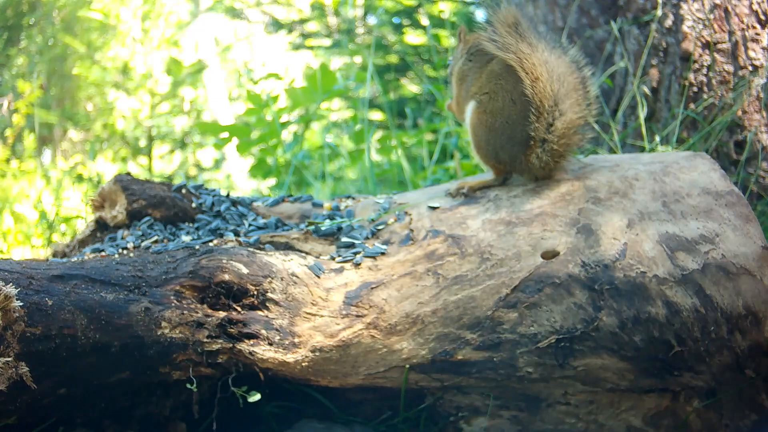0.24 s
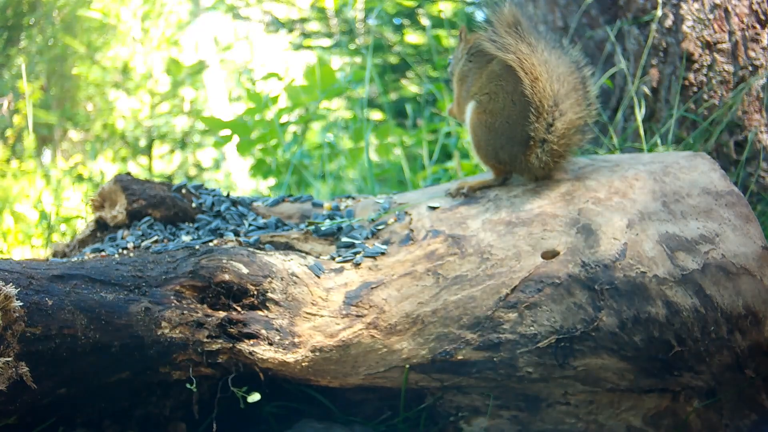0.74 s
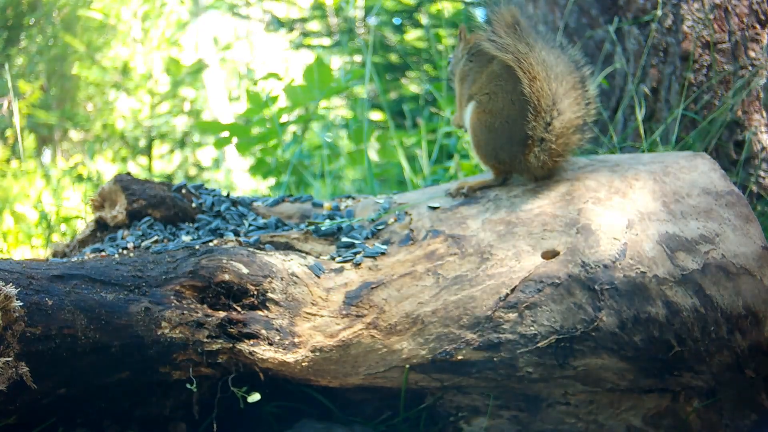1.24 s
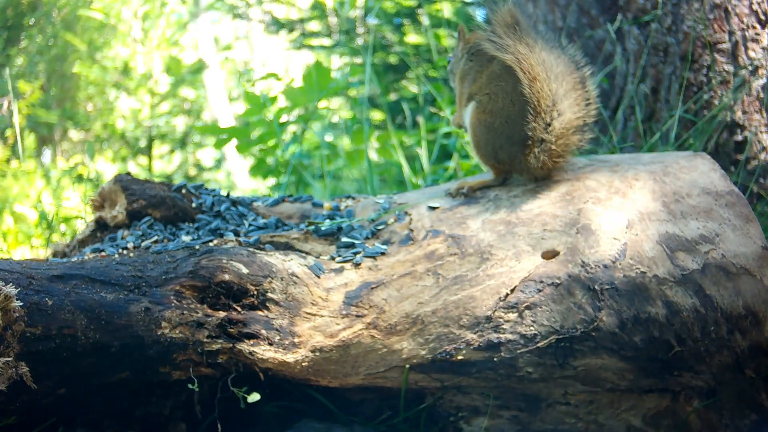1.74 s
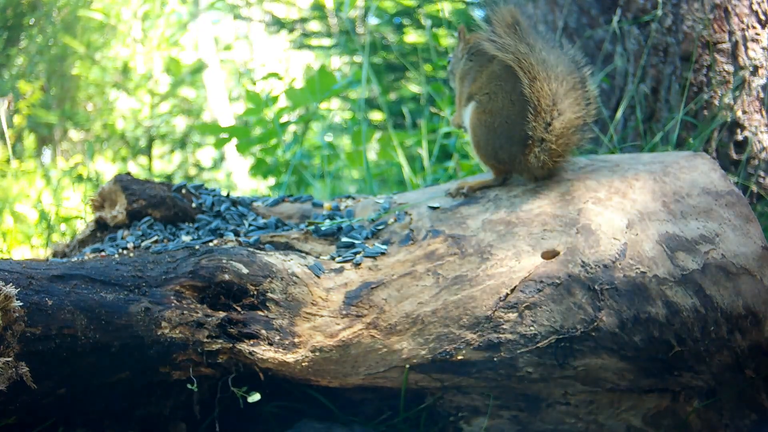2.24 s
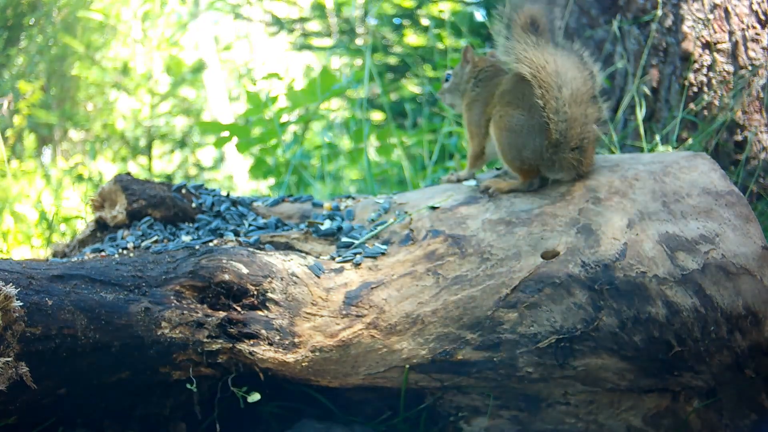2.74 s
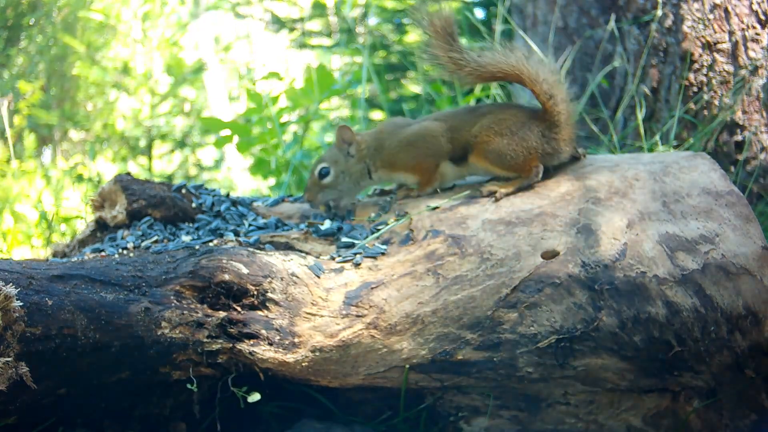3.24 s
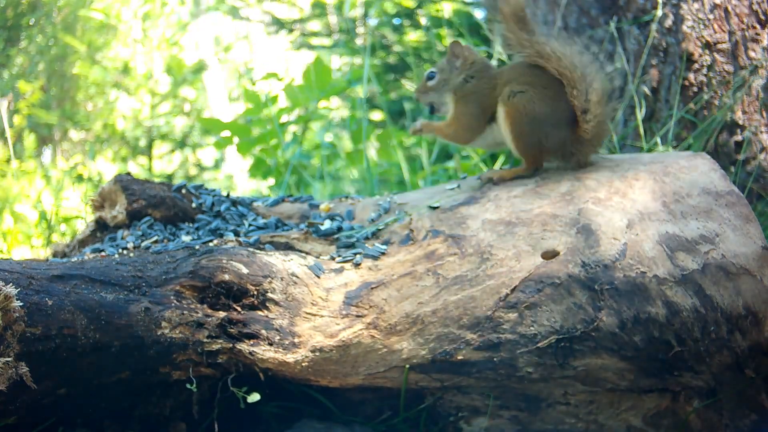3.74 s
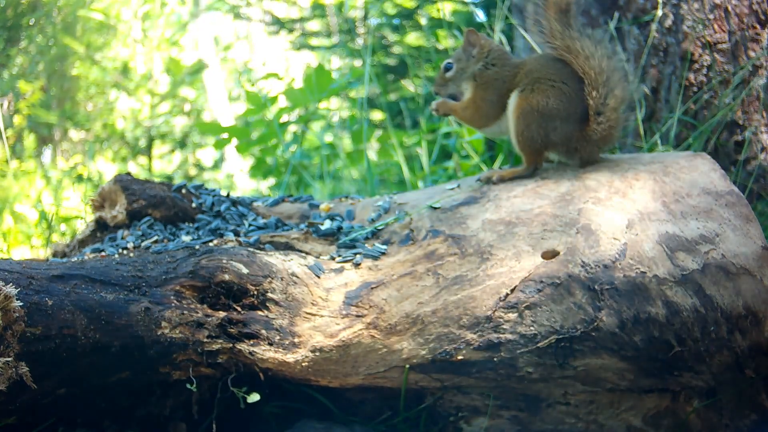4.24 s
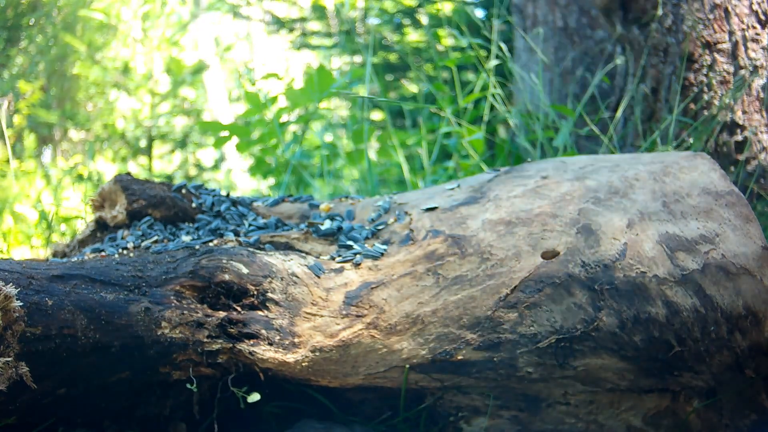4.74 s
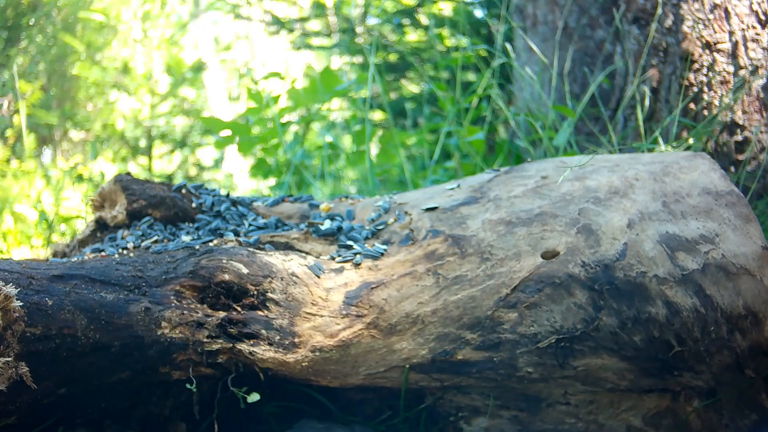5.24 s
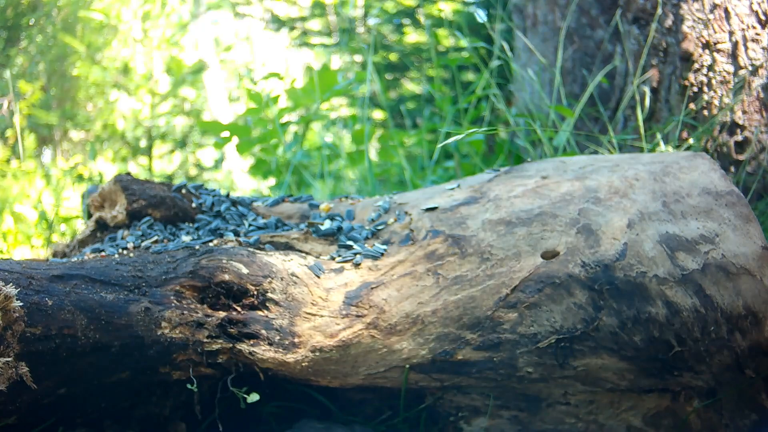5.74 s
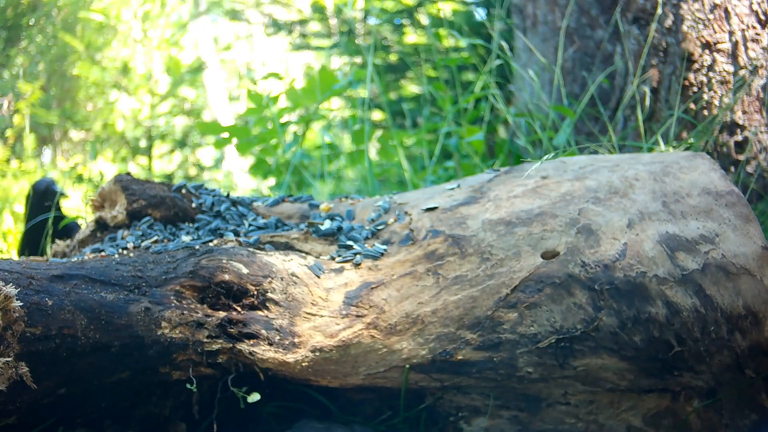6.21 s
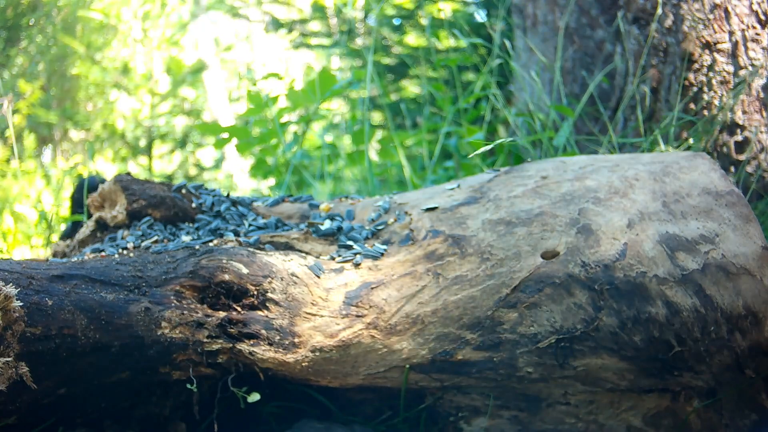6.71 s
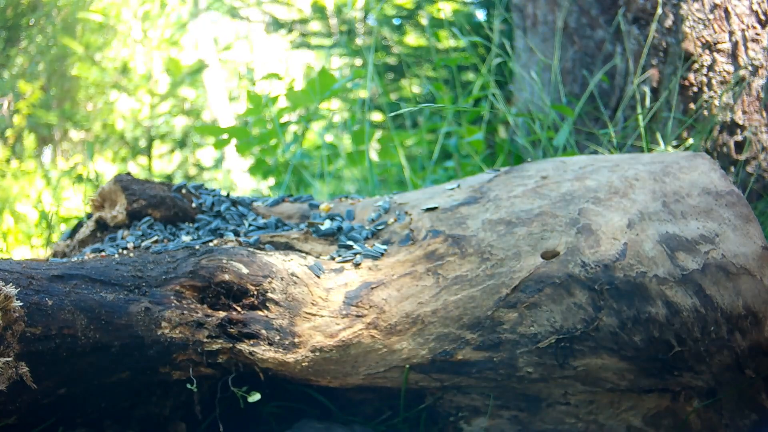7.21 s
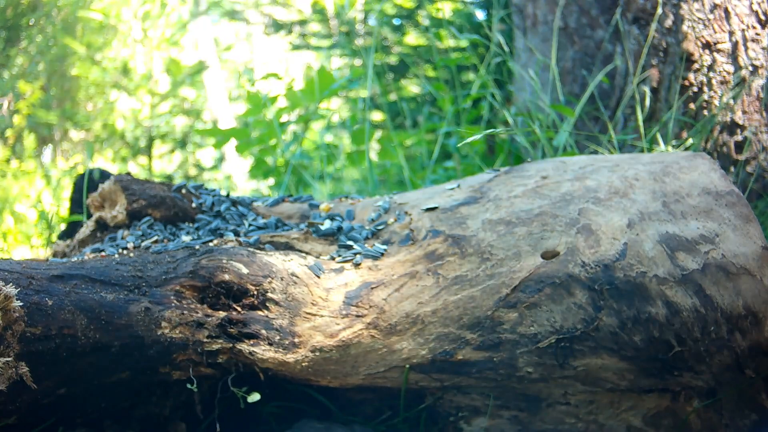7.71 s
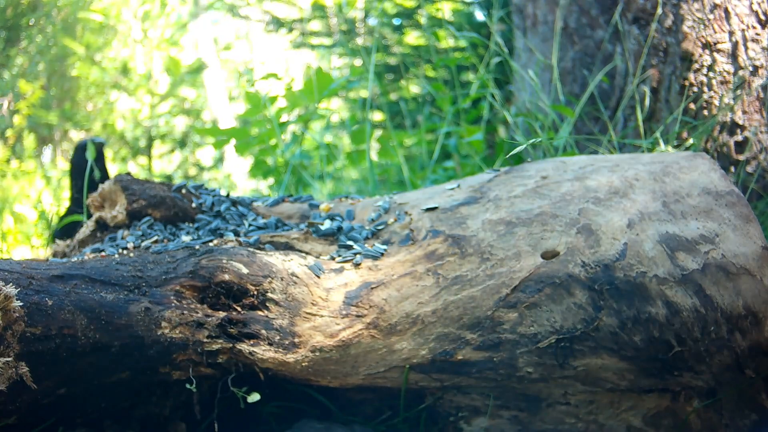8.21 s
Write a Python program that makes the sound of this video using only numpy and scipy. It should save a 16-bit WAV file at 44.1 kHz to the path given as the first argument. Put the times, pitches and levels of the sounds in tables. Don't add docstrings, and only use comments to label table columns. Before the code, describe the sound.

Outdoors among trees, with steady soft leaf rustle and far traffic. A young crow begs in the distance while a small bird lisps thin, high whistles. One begging cry comes close by, followed by two short whines, then an adult crow gives six hoarse, loud caws in quick succession. Sharp chips and tiny twig ticks fall among them. The near calls are mostly dry with a dull tree echo, and their peaks overload the microphone.

```python
import sys
import numpy as np
from scipy import signal
from scipy.fft import rfft, irfft
from scipy.io import wavfile
from scipy.ndimage import uniform_filter1d

SR = 44100
rng = np.random.default_rng(int(sys.argv[2]) if len(sys.argv) > 2 else 0)


def nominal_scale(level):
    x = np.asarray(level, float) / 20
    return 10 ** x


def to_wav(s):
    ch = np.atleast_2d(s).T
    pcm = np.round(np.clip(ch, -1, 1) * 32767)
    wavfile.write(sys.argv[1], SR, pcm.astype(np.int16))


N = 373086


def rms_one(x):
    return x / np.sqrt(np.mean(x ** 2) + 1e-20)


def in_time(rows, t):
    s, *columns = np.transpose(rows)
    return [np.interp(t, s, column) for column in columns]


def span(rows):
    first, last = round(rows[0][0] * SR), min(round(rows[-1][0] * SR), N)
    return slice(first, last), np.arange(first, last) / SR


def drift(hz, size):
    r = np.exp(-2 * np.pi * hz / SR)
    settle = 4000
    wander = signal.lfilter([1], [1, -2 * r, r * r], rng.standard_normal(size + settle))
    return rms_one(wander[settle:])


def filtered(x, order, hz, kind):
    return signal.sosfilt(signal.butter(order, hz, kind, fs=SR, output="sos"), x)


def poles(hz, width):
    r = np.exp(-np.pi * width / SR)
    return [(1 - r * r) / 2, 0, (r * r - 1) / 2], [1, -2 * r * np.cos(2 * np.pi * hz / SR), r * r]


def ring_twice(x, hz, width):
    once = signal.lfilter(*poles(hz, width), x)
    return signal.lfilter(*poles(hz, width), once)


def moving(x, hz, width):
    out, state = np.zeros(len(x)), np.zeros(2)
    for i in range(0, len(x), 128):
        out[i:i + 128], state = signal.lfilter(*poles(hz[i], width), x[i:i + 128], zi=state)
    return out


def air():
    # pitch_hz, level_db (per Hz)
    colour = [(15, -55.5), (25, -33), (41, -7.5), (97, -4), (153, -4.5), (190, -22.5), (427, -10.5),
              (475, -10.5), (1190, -1.5), (1360, -0.5), (2680, -6), (3330, -11), (6720, -27), (8800, -34.5),
              (16000, -68.5)]
    # time_s, level_db
    strength = [(0, -58.5), (2.4, -59), (7, -60), (8.46, -61)]
    hz, db = np.transpose(colour)
    grid = np.maximum(np.fft.rfftfreq(N, 1 / SR), 1)
    gain = nominal_scale(np.interp(np.log(grid), np.log(hz), db))
    noise = irfft(rfft(rng.standard_normal(N)) * gain, N)
    level_db = in_time(strength, np.arange(N) / SR)[0]
    gust_db = 0.5 * drift(1.0, N)
    return rms_one(noise) * nominal_scale(level_db + gust_db)


def lisps():
    # start_s, length_s, pitch_hz, level_db
    notes_sung = [(0.082, .12, 7800, -73), (.23, .07, 8120, -74), (.33, 0.13, 7850, -70),
                  (0.423, 0.1, 7700, -73), (.765, 0.15, 8150, -77), (.975, .15, 8110, -73),
                  (1.153, .1, 8110, -72), (1.275, .14, 8000, -74), (1.59, .07, 7780, -81)]
    scoop_hz, scoop_s, attack_s = 450, 0.03, 0.025
    out = np.zeros(N)
    for s, length, hz, db in notes_sung:
        at, t = span([(s,), (s + length,)])
        scoop = scoop_hz * np.clip(1 - (t - s) / scoop_s, 0, 1)
        pitch = hz - scoop + 90 * drift(120, len(t))
        shape_db = np.interp(t - s, [0, attack_s, length * 0.6, length], [-2, 0, -2.5, -14])
        husk = 1 + 0.5 * drift(90, len(t))
        whistle = np.sin(2 * np.pi * np.cumsum(pitch) / SR)
        out[at] += nominal_scale(db + shape_db) * np.hanning(len(t)) ** 0.17 * husk * whistle
    return out


def chips():
    # start_s, start_hz, end_hz, length_s, level_db
    stray = [
        (1.7, 6900, 6900, 0.069, -75),
        (1.71, 5300, 5160, 0.037, -78),
    ]
    # delay_s, start_hz, end_hz, length_s, level_db
    phrase = [
        (0, 5020, 4080, 0.025, 4),
        (0.01, 3060, 3730, .025, 7),
        (.03, 2560, 2830, .03, 9),
    ]
    # start_s, level_db
    phrase_starts = [(4.575, -69), (4.711, -59), (4.765, -60), (5.257, -62), (5.4, -64.5), (5.967, -61),
                     (6.124, -61)]
    glides = list(stray)
    for s, db in phrase_starts:
        for delay, from_hz, to_hz, length, note_db in phrase:
            glides.append((s + delay, from_hz, to_hz, length, db + note_db))
    out = np.zeros(N)
    for s, from_hz, to_hz, length, db in glides:
        hz = np.linspace(from_hz, to_hz, round(length * SR))
        unsteady_hz = hz + 70 * drift(200, len(hz))
        whistle = np.sin(2 * np.pi * np.cumsum(unsteady_hz) / SR)
        out[round(s * SR):][:len(hz)] += nominal_scale(db + 1.5) * np.hanning(len(hz)) * whistle
    return out


def knocks(events, hz, width):
    clicks = np.full(N, 1e-18)
    for s, db in events:
        clicks[round(s * SR)] = nominal_scale(db) * 6.8 * SR / (np.pi * width)
    return ring_twice(clicks, hz, width)


def twigs():
    # start_s, peak level_db
    snaps = [
        (4.7257, -47),
        (4.769, -44.5),
        (8.3135, -59),
    ]
    return nominal_scale(-4.5) * knocks(snaps, 3800, 3500)


def throat(x, modes, beak_hz, bright_db, restless_db=1.5):
    rung = []
    for k, (hz, width, db) in enumerate(modes):
        sign = (-1) ** k
        rung.append(sign * nominal_scale(db) * ring_twice(x, hz, width))
    width, db = modes[2][1:]
    rung[2] = nominal_scale(db) * moving(moving(x, beak_hz, width), beak_hz, width)
    voice = filtered(sum(rung[:4]), 6, 2040, "low")
    for mode in rung[4:]:
        voice = voice + mode * nominal_scale(bright_db + restless_db * drift(13, len(x)))
    return voice


def crow(calls, modes, jitter, throb, breath, smear, top_hz, low_hz=330):
    out = np.zeros(N)
    for rows in calls:
        at, t = span(rows)
        size = len(t)
        pitch, level_db, half_db, flutter, beak_hz, bright_db = in_time(rows, t)
        rate = 61 * (pitch / 520) ** 0.3
        beat = 2 * np.pi * np.cumsum(rate * (1 + 0.18 * drift(30.2, size))) / SR
        shake = np.sin(beat) + 0.5 * np.sin(2 * beat + 1.02)
        unsteady = 1 + 4 * np.exp(-(t - t[0]) / 0.028) + np.exp((t - t[-1]) / 0.015)
        wobble = flutter * shake + jitter * unsteady * drift(150, size)
        turn = np.pi * np.cumsum(pitch * (1 + wobble)) / SR
        order = np.arange(1, int(2 * top_hz / pitch.min()))[:, None]
        lines = np.cos(order * turn + smear * order ** 2) * (order * pitch < 2 * top_hz)
        lines[0] *= 0.08
        pulses = lines[1::2].sum(axis=0) + nominal_scale(half_db) * lines[::2].sum(axis=0)
        puff = 1 + 0.5 * np.cos(2 * turn)
        hiss = breath * unsteady * puff * signal.lfilter([6.3, -4.5], [1], rng.standard_normal(size))
        source = (pulses + hiss) * (1 + throb * flutter * np.cos(beat + 1.1))
        voice = throat(source, modes, beak_hz, bright_db)
        voice = filtered(voice, 4, [low_hz, top_hz], "band")
        evened = voice / np.sqrt(uniform_filter1d(voice ** 2, size=900) + 1e-12)
        from_edge = np.minimum(t - t[0], t[-1] - t)
        out[at] += evened * nominal_scale(level_db) * np.clip(from_edge / 0.0012, 0, 1)
    return out


def cry(s, length, db, top_hz, beak_hz):
    rise_s, release_s, start_share = 0.11, 0.11, 0.88
    sag_hz_per_s, beak_opens_hz_per_s = 250, 1600
    points = [(0, -12.5), (0.035, -0.5), (rise_s, 0), (length - release_s, -1), (length, -12.5)]
    rows = []
    for t, rel_db in points:
        risen = min(1, start_share + (1 - start_share) * np.sqrt(t / rise_s))
        after_s = max(t - rise_s, 0)
        pitch = top_hz * risen - sag_hz_per_s * after_s
        beak = beak_hz + beak_opens_hz_per_s * after_s
        rows.append((s + t, pitch, db + rel_db, -30, 0.003, beak, -0.5))
    return rows


def far_young_crow():
    # start_s, length_s, level_db, top_pitch_hz, beak_hz
    cries = [
        (0.0, 0.4, -48, 367.4, 1500),
        (0.778, .44, -47.5, 369.5, 1520),
        (1.939, 0.23, -45.5, 332, 1900),
        (5.932, 0.41, -47.5, 356, 1560),
    ]
    # time_s, pitch_hz, level_db, beak_hz
    whine_tables = [
        [(3.04, 699, -59, 1450), (3.08, 722, -53, 1450), (3.13, 703, -44.5, 1730), (3.18, 651, -45.5, 1990),
         (3.22, 638, -48, 2000)],
        [(3.235, 571, -41, 1400), (3.262, 707, -37, 1526), (3.29, 729, -28, 1480), (3.312, 760, -34.5, 1410)],
    ]
    # pitch_hz, width_hz, level_db
    side_on = [(695, 650, -17.5), (1400, 290, 7), (1800, 575, 7), (2510, 870, -20), (3250, 730, -10),
               (4060, 510, -15.5), (4800, 210, -13.5), (5300, 400, -17.5)]
    calls = [cry(*row) for row in cries]
    for rows in whine_tables:
        calls.append([(s, hz, db, -32, 0.003, beak_hz, -8) for s, hz, db, beak_hz in rows])
    voice = crow(calls, side_on, jitter=0.0025, throb=3.0, breath=0.14, smear=0.03, top_hz=5600)
    return nominal_scale(-4.0) * voice


def near_young_crow():
    # time_s, pitch_hz, level_db, beak_hz, brightness_db
    course = [(2.466, 237, -26.5, 1335, -8.5), (2.494, 313.3, -16.5, 1366, -3.5),
              (2.519, 333, -14, 1380, -5.5), (2.558, 335.3, -10, 1400, -7), (2.668, 312.9, -19.5, 1436, -3),
              (2.745, 311.9, -19.5, 1392, -3.5), (2.849, 278.7, -17.5, 1650, -6.5),
              (2.925, 267.3, -20, 1510, -1), (2.999, 217.1, -30, 1540, -6.5)]
    # pitch_hz, width_hz, level_db
    young = [(635, 1210, -14.5), (1050, 420, -10), (1650, 287, 4.5), (2110, 310, -7), (3130, 820, -12),
             (4450, 490, -16), (5300, 620, -23.5), (6310, 940, -29.5), (7700, 1700, -33.5)]
    rows = [(s, hz, db, -38, 0.003, beak_hz, bright_db) for s, hz, db, beak_hz, bright_db in course]
    return crow([rows], young, jitter=0.002, throb=3.0, breath=0.05, smear=0.06, top_hz=12500, low_hz=390)


def pops():
    # start_s, peak level_db
    openings = [
        (2.464, -42),
        (4.102, -39.5),
        (4.794, -36.5),
        (5.422, -35),
        (6.191, -36),
        (7.2095, -43.5),
    ]
    return knocks(openings, 1300, 790)


def caw(s, length, db, top_hz, tired_hz, flutter, left, half_db, drop_s, tired_db):
    start_hz, end_hz, rise_s, hold_s = 454, 308.3, 0.055, 0.03
    beak_start, beak_top, beak_wide, beak_tired, beak_end = 1520, 1560, 1627, 1380, 1474
    edge_flutter = 1.51
    top, tired, end = s + rise_s + hold_s, s + length - drop_s, s + length
    halfway = 0.13 - 0.07 * tired_db
    sag_hz, curl_hz = tired_hz - top_hz, end_hz - tired_hz
    # time_s, pitch_hz, relative level_db, share of the flutter, beak_hz
    points = [
        (s, start_hz, -19.5, edge_flutter, beak_start),
        (s + 0.016, (start_hz + top_hz) * 0.47, -5, edge_flutter, beak_start),
        (s + rise_s, top_hz, 0, 1, beak_top),
        (top, top_hz, 0, 1, beak_top),
        (0.8 * top + 0.2 * tired, top_hz + halfway * 0.52 * sag_hz, -0.6, 1, beak_wide),
        ((top + tired) / 2, top_hz + halfway * sag_hz, 0.25 * tired_db, (1 + left) / 2,
         (beak_wide + beak_tired) * 0.504),
        (tired, tired_hz, tired_db, left, beak_tired),
        (end - 0.44 * drop_s, tired_hz + 0.229 * curl_hz, tired_db - 4, left, beak_tired),
        (end - 0.3 * drop_s, tired_hz + 0.75 * curl_hz, tired_db - 6, left, beak_end),
        (end, end_hz, tired_db - 18, left, beak_end)]
    rows = []
    for t, hz, rel_db, share, beak_hz in points:
        half_now_db = half_db - 8 * (t - s) / length
        rows.append((t, hz, db + rel_db, half_now_db, flutter * share, beak_hz, 4.5))
    return rows


def adult_crow():
    # start_s, length_s, level_db, top_pitch_hz, tired_pitch_hz
    caw_list = [
        (3.308, 0.6, -15.5, 610.4, 437.3),
        (4.104, .46, -14, 635.2, 456.2),
        (4.798, 0.36, -10.5, 608.2, 454.2),
        (5.426, .522, -16, 613, 422),
        (6.198, 0.53, -14, 613, 447.3),
        (7.218, 0.43, -20.5, 542.3, 459),
    ]
    # flutter_share, share_left_when_tired, half_pitch_db, closing_drop_s, tired_level_db
    hoarseness = [
        (.045, 1.05, -10.5, 0.073, -5),
        (.055, 1.32, -9, 0.087, -6),
        (0.075, 0.92, -10.5, 0.082, -7.5),
        (0.065, 0.45, -17.5, 0.06, -7.5),
        (0.061, 1.04, -15.5, .065, -5.5),
        (0.032, 1.66, -8, 0.13, -2.5),
    ]
    # pitch_hz, width_hz, level_db
    facing = [(453, 360, -14.5), (1152, 1750, -4), (1660, 469, 11.5), (2470, 240, -42.5),
              (3133, 610, -14.5), (4468, 650, -22.5), (5205, 350, -26.5), (6300, 1640, -35),
              (8380, 2000, -47.5)]
    # pitch_hz, width_hz, level_db
    turned = [(510, 480, -10.5), (1030, 1100, -9), (1660, 525, 9), (1900, 240, -47), (2350, 990, -23),
              (3490, 570, -18), (4470, 720, -23), (5620, 1600, -35), (6800, 1300, -37.5), (7700, 2700, -45)]
    answers = [caw(*row, *hoarse) for row, hoarse in zip(caw_list, hoarseness)]
    caws = crow(answers[:-1], facing, jitter=0.00749, throb=0.83, breath=0.6, smear=0.14, top_hz=9400)
    last = crow(answers[-1:], turned, jitter=0.0055, throb=2.7, breath=0.42, smear=0.1, top_hz=13000)
    return caws + last


def trees(x):
    t60_s = 0.48
    t = np.arange(SR) / SR
    echo = rng.standard_normal(SR) * nominal_scale(-60 * t / t60_s) * np.clip(t / 0.0097, 0, 1)
    echo = filtered(echo, 1, (924, 4930), "band")
    return signal.fftconvolve(x, echo / np.sqrt(np.sum(echo ** 2)))[:N]


def scene():
    floor = air()
    small = lisps() + chips() + twigs()
    far = far_young_crow()
    near = near_young_crow() + pops() + adult_crow()
    echoes = trees(nominal_scale(-24.0) * near + nominal_scale(-3.0) * far + nominal_scale(-12) * small)
    return (near + far + small + echoes + floor)[None]


def low_pass(x):
    return signal.sosfilt(signal.butter(12, 16100, fs=SR, output="sos"), x)


def record(dry):
    knee_db, squeeze, release_db_per_s = -10.5, 0.6, 293.5
    over_db = np.maximum(20 * np.log10(np.abs(dry) + 1e-9) - knee_db, 0)
    ramp = release_db_per_s * np.arange(N) / SR
    held_db = np.maximum.accumulate(over_db + ramp, axis=1) - ramp
    limited = dry * nominal_scale(-squeeze * uniform_filter1d(held_db, size=3, axis=1))
    spill = 0.89 * filtered(np.maximum(limited - 0.2, 0), 1, 2630, "low")
    crackle = -0.48 * np.maximum(limited - 0.26, 0)
    bent = limited + spill + crackle
    own_hiss = nominal_scale(-90) * rng.standard_normal(N)
    return low_pass(filtered(bent, 1, 30, "high") + own_hiss)


dry = scene()
out = record(dry)
to_wav(out)
```